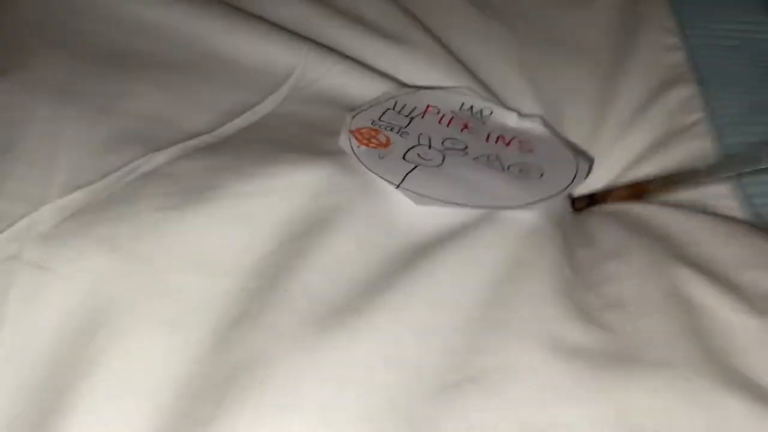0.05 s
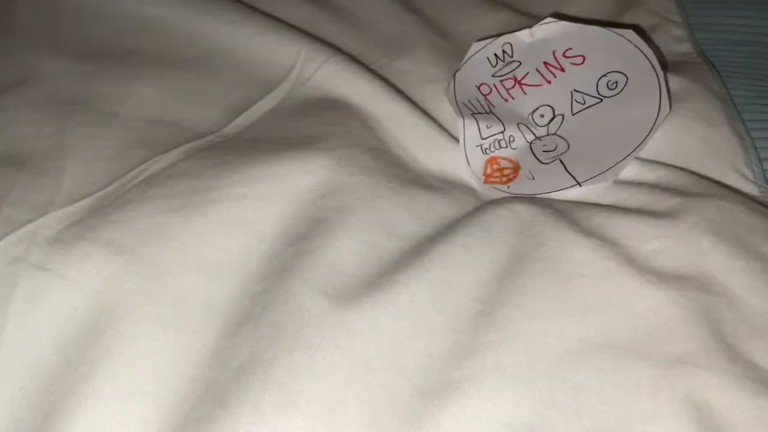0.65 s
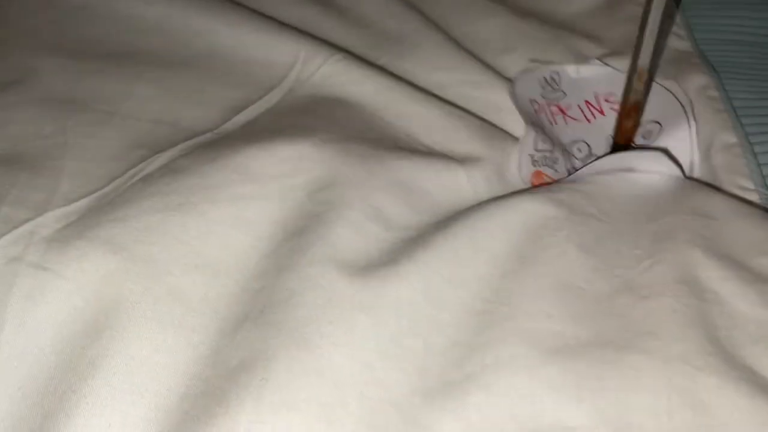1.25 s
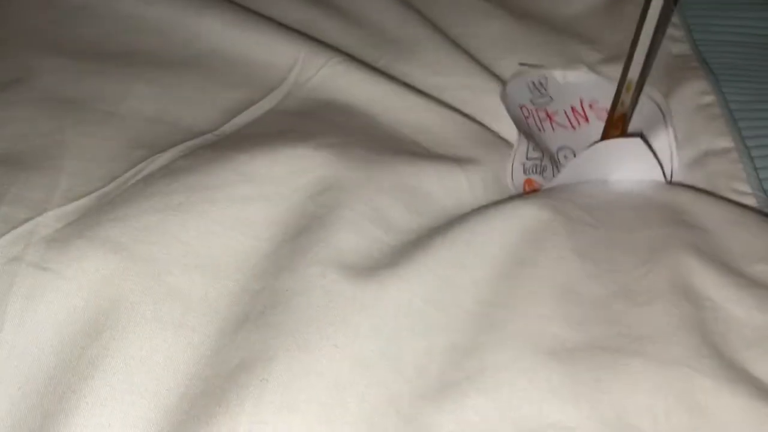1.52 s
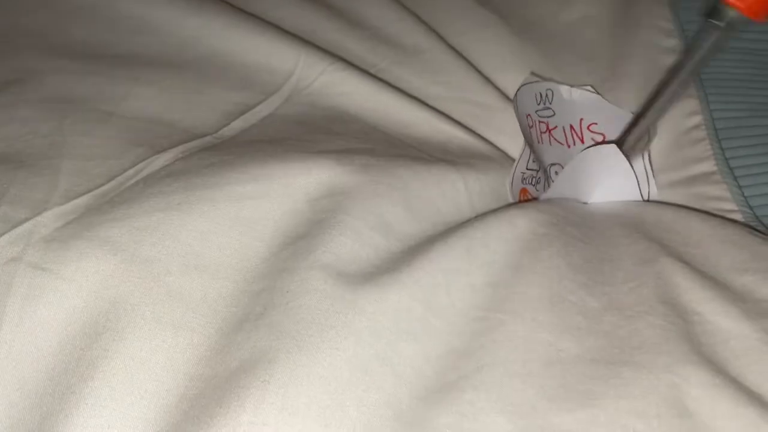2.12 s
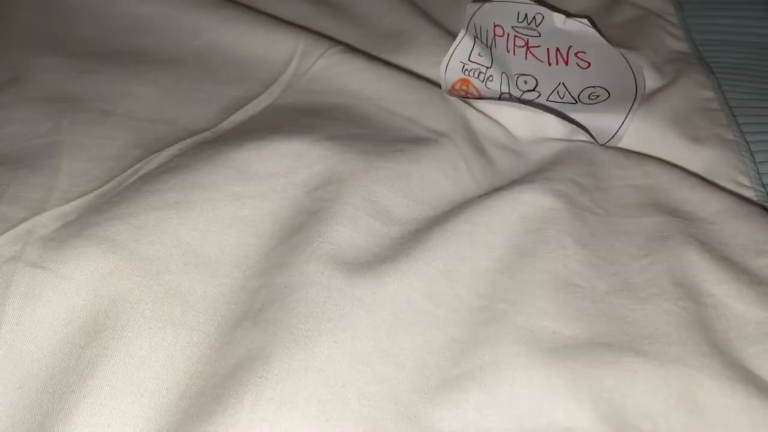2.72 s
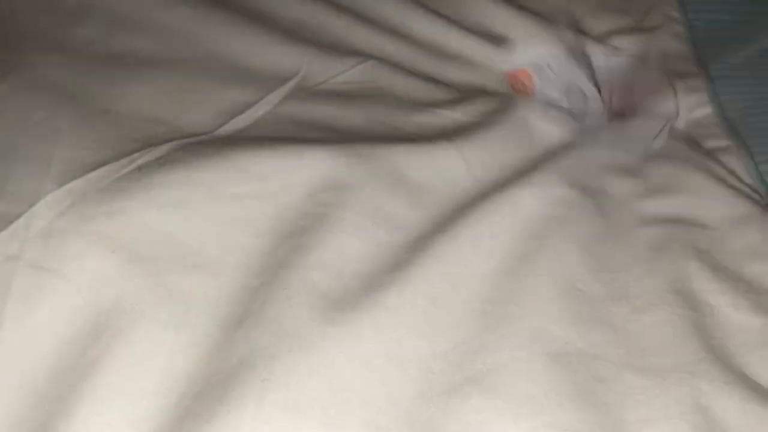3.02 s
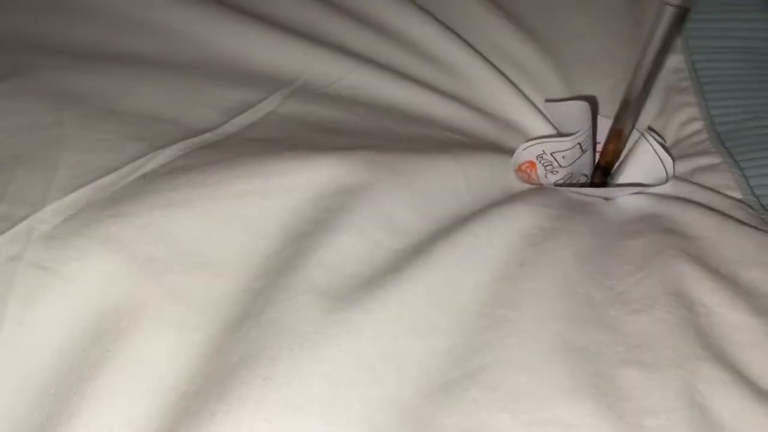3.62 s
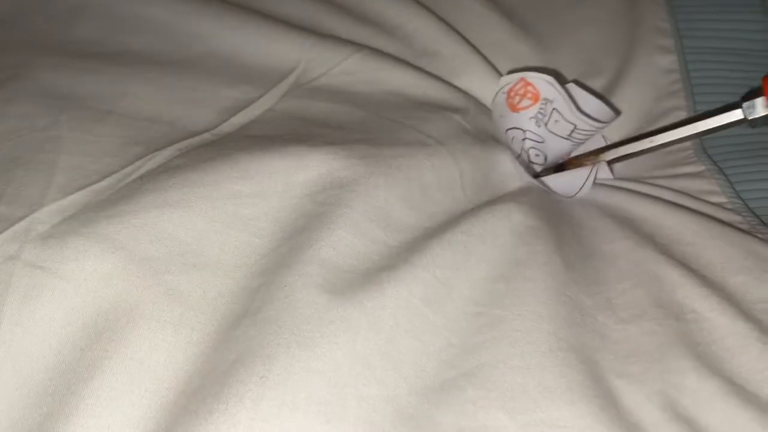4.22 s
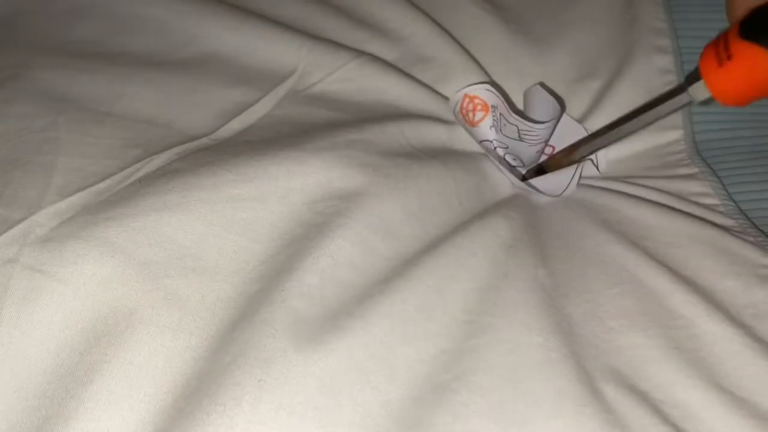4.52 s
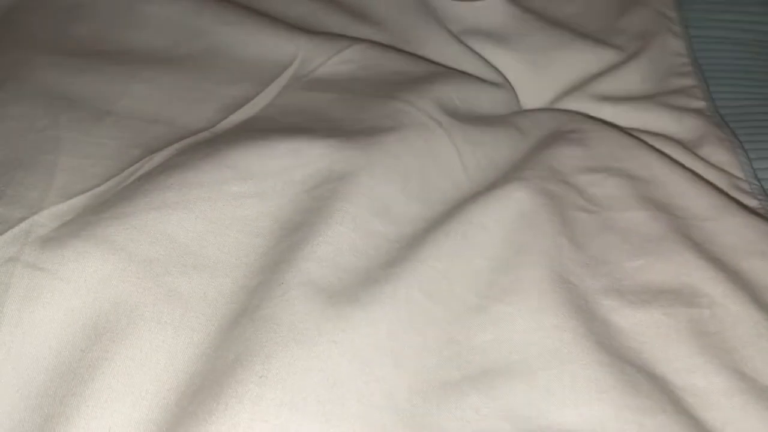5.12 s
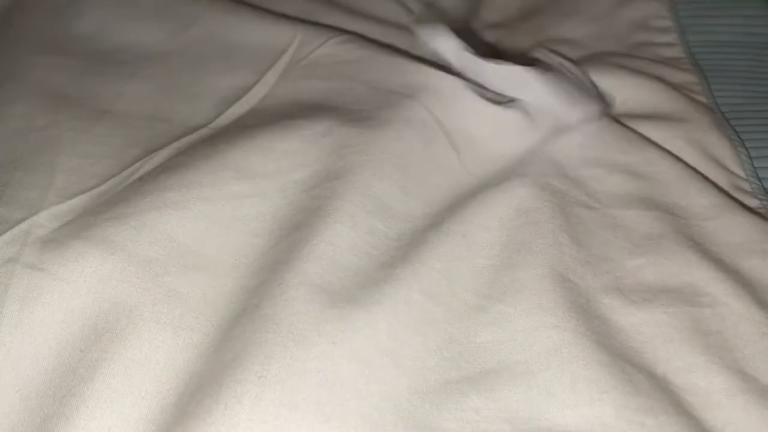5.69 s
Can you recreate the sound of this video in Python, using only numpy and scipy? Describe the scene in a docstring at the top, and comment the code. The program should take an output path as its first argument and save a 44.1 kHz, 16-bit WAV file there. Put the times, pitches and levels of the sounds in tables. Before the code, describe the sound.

A soft, low thump of bedding opens, close by in a quiet bedroom with a steady low murmur. At 0.4 seconds a screwdriver jabs a paper disc on the duvet: a sharp slap, a brief crackle, a hollow knock and a thump. A lighter jab follows at 0.8. From 1 to 2.5 seconds, paper and blade slide over the cotton in faint, short hisses and dull rustles, with a very faint, thin whistle at 1.2. The loudest jab lands at 2.9 seconds with a deep thud, then a lighter double tap at 3.4. Soft scrapes return from 3.8, with a brighter swish and a tiny zip of threads at 4.7 and small paper ticks just after. Another crunching jab and thump comes at 5.4 seconds, trailed by a hissing scrape and a small tap around 5.7.

```python
"""A screwdriver jabs a paper disc lying on a duvet, close by in a quiet bedroom.
Each jab slaps the paper, crumples it and thumps the bedding; the disc pops with a hollow knock.
Between jabs paper and blade hiss over the cotton, with dull rustles and thread zips.
A faint, thin whistling tone sounds once.
Two closely spaced microphone ports on a camera hear it all over the low murmur of the room."""
import sys
import numpy as np
from scipy import signal
from scipy.fft import rfft, irfft
from scipy.io import wavfile
from scipy.ndimage import uniform_filter1d

SR = 44100
rng = np.random.default_rng(int(sys.argv[2]) if len(sys.argv) > 2 else 0)


def transcribe(signal):
    """Save signal, clipped to [-1, 1], as a 16-bit WAV file at the path in sys.argv[1]."""
    frames = np.atleast_2d(signal).T
    limited = np.clip(frames, -1, 1)
    pcm = np.round(limited * 32767).astype(np.int16)
    wavfile.write(sys.argv[1], SR, pcm)


N = 262395
TIME, HZ = np.arange(N) / SR, np.fft.rfftfreq(N, 1 / SR)


def amp(db):
    """Decibels to gain."""
    return 10 ** (np.asarray(db) / 20)


def unit(x):
    """Scales to an rms of one."""
    return x / np.sqrt(np.mean(x ** 2) + 1e-20)


def curve(points, hz):
    """Reads a table along a log-frequency axis."""
    freqs, values = np.transpose(points)
    return np.interp(np.log(hz + 1), np.log(freqs + 1), values)


def add(mix, time, sound):
    """Mixes a sound in at a time in seconds; one that began before zero is already under way."""
    start = round(time * SR)
    sound = sound[max(-start, 0):]
    part = mix[max(start, 0):][:len(sound)]
    part += sound[:len(part)]


def ring(x, colour, size=2048):
    """A causal EQ; colour gives its dB at any frequency."""
    log_gain = np.log(amp(colour(abs(np.fft.fftfreq(size, 1 / SR)))))
    response = np.fft.ifft(np.exp(np.conj(signal.hilbert(log_gain)))).real
    return signal.oaconvolve(x, response[:size // 2])[:len(x)]


def wander(n, span, passes=1):
    """A random modulator: noise smoothed over span samples."""
    noise = rng.standard_normal(n)
    for _ in range(passes):
        noise = uniform_filter1d(noise, span)
    return unit(noise)


def stroke(time, hold, db, attack, release, drift_db=0):
    """One sound's envelope: swells until time, drifts by drift_db while it holds, dies away."""
    fade = np.maximum(time - TIME, 0) / attack + np.maximum(TIME - time - hold, 0) / release
    progress = np.clip((TIME - time) / hold, 0, 1)
    return amp(db + drift_db * progress) * np.exp(-np.minimum(fade, 20))


def friction(slips_per_s, spread_db, smooth_share, flutter_db):
    """Tiny slips of uneven size in a smooth hiss; the grip varies every few milliseconds."""
    sizes = amp(spread_db * np.minimum(rng.exponential(1, N), 4))
    slips = rng.standard_normal(N) * sizes * (rng.random(N) < slips_per_s / SR)
    grip = amp(flutter_db * wander(N, span=260, passes=2))
    hiss = rng.standard_normal(N)
    return (np.sqrt(1 - smooth_share) * unit(slips) + np.sqrt(smooth_share) * hiss) * grip


def pitch_drops(hits, glide_share, sharpness, roughness):
    """A struck sheet drags ever more of itself along, so its pitch falls as it swells and dies."""
    out, t = np.zeros(N), np.arange(SR // 5) / SR
    for time, db, first_hz, last_hz, attack in hits:
        glide = glide_share * attack  # a slower blow also sinks more slowly
        hz = last_hz + (first_hz - last_hz) * np.exp(-t / glide)
        swell = (t / attack * np.exp(.5 * (1 - (t / attack) ** 2))) ** sharpness
        wobble = roughness * wander(len(t), span=int(SR / last_hz / 2), passes=2)
        add(out, time, amp(db) * swell * np.sin(2 * np.pi * np.cumsum(hz) / SR + wobble))
    return out


# Soft low thumps: (time [s], level [dB], start pitch [Hz], end pitch [Hz], attack [s])
BED_THUMPS = [(-.012, -17.5, 119.5, 73.1, .016), (.377, -29.5, 465, 62.3, .035),
              (.826, -42, 219.4, 71.87, .024), (1.685, -37.5, 144, 105.4, 0.013),
              (2.647, -35, 148, 78.4, .019), (2.8845, -17, 452.7, 59.67, .027),
              (2.962, -38, 123.4, 71.5, 0.021), (3.05, -46, 91.7, 68.45, 0.027),
              (3.387, -46, 520, 207, 0.0081), (3.420, -40, 329, 113.4, 0.0082),
              (3.44, -49.5, 109, 64.6, 0.013), (4.075, -44.5, 193.7, 164, .0205),
              (4.352, -43.5, 131.4, 85.5, .017), (5.398, -31.5, 453, 159, 0.0158),
              (5.423, -28, 190, 63.5, 0.024)]


def bed_thumps(rumble_db=-17, rumble_hz=68, t60_s=.17):
    """The bedding gives way; the mattress takes up each thump and rumbles on briefly."""
    thumps = pitch_drops(BED_THUMPS, glide_share=.41, sharpness=1.44, roughness=.28)
    t = np.arange(22000) / SR
    tail = rng.standard_normal(len(t)) * np.exp(-np.log(1000) * t / t60_s)
    tail = ring(tail, lambda hz: np.maximum(-14 * np.log2((hz + 1) / rumble_hz) ** 2, -90), size=8192)
    power = abs(rfft(tail)) ** 2
    passband_gain = np.sqrt((power ** 2).sum() / power.sum())
    return thumps + amp(rumble_db) * signal.fftconvolve(thumps, tail)[:N] / passband_gain


# Room tone EQ: (frequency [Hz], gain [dB])
MURMUR_EQ = [(20, -26), (42, -14.5), (65, -3.5), (110, -4), (180, -2.5), (270, .5), (400, -7.5), (560, -14),
             (1000, -23.3), (1600, -29.3), (2500, -38.5), (4000, -48.5), (6000, -55), (8000, -58),
             (16000, -66.5)]
# Room tone width: (frequency [Hz], left-right correlation [1 = mono])
MURMUR_CORRELATION = [(60, 0.98), (150, 0.95), (300, 0.8), (600, 0.21), (1500, 0.87), (6000, 1)]


def murmur(level_db=-49.5):
    """Steady low room noise, nearly the same at both ports in the bass."""
    left, other = rfft(rng.standard_normal((2, N)))
    shared = curve(MURMUR_CORRELATION, HZ)
    right = shared * left + np.sqrt(1 - shared ** 2) * other
    spectra = np.array([left, right]) * amp(curve(MURMUR_EQ, HZ))
    return amp(level_db) * unit(irfft(spectra, N))


# Hollow pops: (time [s], level [dB], start pitch [Hz], end pitch [Hz], attack [s])
KNOCKS = [(.376, -26.5, 1395, 420, 0.0023), (.7985, -27.5, 436, 175.3, 0.0027),
          (.7975, -39, 1500, 800, 0.0017), (.8265, -38, 1238, 420, 0.0022),
          (2.8825, -24.5, 947, 340, .0026), (2.886, -35.5, 680, 482, 0.0039),
          (3.3885, -34, 1088, 288, 0.0012), (3.4218, -34.5, 1345, 860, 0.00225),
          (4.3435, -47.5, 1630, 690, 0.0022), (5.3995, -35.5, 960, 346, 0.0022),
          (5.652, -48.5, 880, 740, 0.0059)]


def knocks():
    """The disc pops through with a hollow, falling knock."""
    return pitch_drops(KNOCKS, glide_share=1.6, sharpness=2.8, roughness=.23)


# The paper's resonant peaks: (frequency [Hz], width [Hz], boost [dB])
DISC_MODES = [(1150, 67, 7), (1630, 110, 7), (2650, 460, 2.5), (3260, 440, 6), (4105, 300, 5),
              (5414, 420, 6), (6950, 510, 7.5), (7950, 450, 8.5)]


def disc_body(x, tuning, tilt_db):
    """The disc's resonances lift narrow bands and ring on briefly; each new bend retunes them."""
    def colour(hz):
        peaks = sum(db / (1 + (2 * (hz / tuning - f) / width) ** 2) for f, width, db in DISC_MODES)
        return peaks + tilt_db * np.log2(np.maximum(hz, 1000) / 5000)
    return ring(x, colour)


# Slap EQ of flat and of creased paper: (frequency [Hz], gain [dB])
FLAT_EQ = [(100, -6.5), (350, 0.5), (600, 1), (1150, -0.5), (1500, -7), (1900, -4), (2300, -4.5),
           (2700, -8), (3500, -8.5), (4200, -2.5), (5500, 7.5), (6300, -5), (6900, -1), (7900, 1.5),
           (9000, -9.5), (13000, -12), (15500, -13)]
CREASED_EQ = [(100, -10), (550, 1), (820, -4.5), (1150, -15), (1650, -9.5), (2100, -6), (3200, -5.5),
              (4000, -3.5), (4500, -8.5), (5450, -6.5), (6050, 3.5), (6500, -7), (7000, 1), (8500, -1.5),
              (9200, 6), (10100, -5), (10900, 8), (11700, -8.5), (12500, -6), (14000, -10), (15500, -6.5)]
# The tip slaps the paper, or the paper snaps:
# (time [s], relative level [dB], decay [s], crease [0 flat, 1 creased], tuning [ratio], tilt [dB/oct])
SLAPS = [(0.3765, -21, .002, 0.022, 1.08, -1), (0.382, -47, 0.0013, .1, 1.0, -1),
         (.7936, -36.5, 0.004, 0.58, 0.88, -2), (0.822, -47, 0.0035, .3, 0.54, -3),
         (0.8264, -48.5, 0.0014, 0.26, 0.87, -4.5), (2.8824, -16, 0.0014, 0.94, 1.025, 0.5),
         (2.888, -33, .0033, 0.28, 1.17, 2), (2.999, -45.5, 0.0022, 0.66, 1.12, 2.5),
         (3.018, -61, 0.0018, 0.55, 0.74, 2.5), (3.075, -79.5, 0.0036, 0.56, 1.0, 7.5),
         (3.3863, -41, .0034, 0.22, 0.99, -4), (3.4165, -44, .0024, 0.54, 0.79, -2),
         (3.430, -50.5, 0.0014, .4, 1, -2), (3.4509, -49.5, .0012, 0.95, 1.9, -3),
         (4.481, -55, 0.0026, 0.69, 1.2, -2.5), (4.778, -63, 0.0027, 0.3, 0.96, 1),
         (4.823, -48.5, 0.0053, 0.37, 0.83, 0.5), (4.830, -52.5, 0.0026, 1, 1.04, -2),
         (4.844, -60, 0.0057, 0.47, 0.895, 1), (4.858, -62.5, .0093, .64, 1.2, -6),
         (4.9097, -53.5, 0.0076, 0.54, 1.07, -1), (4.927, -57.5, 0.014, 0.52, 1.06, -4.5),
         (5.3873, -36.5, .0027, 0.77, 1.22, -1), (5.399, -35, 0.0035, .6, 1.17, -0.5),
         (5.4043, -39, .0014, 0.76, 1.17, -2), (5.417, -37.5, 0.0012, .4, 1.17, 0),
         (5.6507, -45.5, 0.0014, 0.85, 0.84, -2)]


def slaps(attack_s=.00092):
    """A burst of buckling a few milliseconds long rings the disc; creases make it brighter."""
    out, t = np.zeros(N), np.arange(4096) / SR
    for time, db, decay, crease, tuning, tilt in SLAPS:
        swell = np.minimum(t / attack_s, 1) ** 2 * np.exp(-np.maximum(t - attack_s, 0) / decay)
        burst = rng.standard_normal(len(t)) * swell
        burst = irfft(np.exp(1j * np.angle(rfft(burst))))  # the blow drives all frequencies alike
        limit = swell * burst.std() / swell.std() + 1e-9
        burst = np.tanh(burst / limit) * swell  # each buckle travels only so far
        slap = ring(burst, lambda hz: (1 - crease) * curve(FLAT_EQ, hz / tuning)
                    + crease * curve(CREASED_EQ, hz / tuning))
        slap *= np.sqrt(220) / np.linalg.norm(slap)  # the energy of 5 ms at unit rms
        add(out, time, amp(db) * disc_body(slap, tuning, tilt))
    return out


# Crackle EQ: (frequency [Hz], gain [dB])
CRUMPLE_EQ = [(100, -8), (500, -3.5), (1150, -12.5), (2000, -9.5), (2600, -12.5), (3300, -11),
              (4200, -10.5), (5600, -5.5), (7000, -7.5), (9000, -10), (12000, -10.5), (15500, -10.5)]
# The paper crunches as the tip drives in, then settles:
# (time [s], hold [s], relative level [dB], release [s], tuning [ratio], tilt [dB/oct])
CRUMPLES = [(.388, 0.0081, -36, .016, 1.0, 0), (0.805, 0.0085, -41.5, 0.006, 1.03, 0.5),
            (0.819, 0.013, -45.5, 0.026, 1.1, 0.5), (2.882, .0054, -37.5, 0.029, 1.0, -2.5),
            (3.388, 0.015, -46, 0.011, 0.98, 2), (3.401, 0.013, -44.5, 0.025, 0.99, -1),
            (5.388, 0.017, -39.5, 0.017, 1.03, .5)]


def crumples(gain_db=-2, attack_s=.001):
    """The disc folds round the tip in a dense crackle."""
    crackle = friction(slips_per_s=4500, spread_db=3, smooth_share=.62, flutter_db=1.45)
    crackle = unit(ring(crackle, lambda hz: curve(CRUMPLE_EQ, hz)))
    out = np.zeros(N)
    for time, hold, db, release, tuning, tilt in CRUMPLES:
        fold = crackle * stroke(time, hold, db, attack_s, release, drift_db=2)
        start = time - 2 * attack_s
        add(out, start, disc_body(fold[round(start * SR):][:16384], tuning, tilt))
    return amp(gain_db) * out


# Cotton hiss EQ: (frequency [Hz], gain [dB])
SLIDE_EQ = [(100, -18), (800, -12), (1200, -8), (2000, -3), (2700, 2), (3350, 3.5), (4400, -1.2), (5300, 0),
            (6300, -3.1), (7100, -.5), (9000, -9.5), (11000, -13), (12700, -14), (14200, -21),
            (15600, -21.5)]
# Paper and blade swish over cotton: (time [s], hold [s], relative level [dB], attack [s], release [s],
# drift over the hold [dB], tilt [dB/oct], edge resonance [Hz])
SLIDES = [(0.487, 0.037, -55, 0.019, .0043, -2, 7.5, 6900), (0.544, .075, -77, .018, .012, -3, 6, 5500),
          (.915, 0.022, -74, 0.013, .02, 1, 2, 5500), (0.965, 0.013, -58, 0.013, 0.0084, 3, 9.5, 7450),
          (1.197, .11, -61, 0.034, 0.019, -5.5, 6, 6200), (1.35, .073, -67, .025, 0.018, -2, 5, 7000),
          (1.534, 0.027, -61.5, 0.026, 0.017, 0.5, 7.5, 5600),
          (1.64, 0.03, -71.5, 0.037, 0.079, -3, 4.5, 5500),
          (2.179, 0.098, -56, 0.023, 0.015, 3, 11.5, 12650),
          (2.384, 0.065, -55.5, 0.041, 0.015, -3, 8, 7000),
          (2.988, 0.016, -50.5, 0.012, 0.0027, -1, 10, 5800),
          (3.023, 0.058, -79, .03, 0.012, -2, 9.5, 5500), (3.804, 0.1, -62.5, 0.043, 0.037, 4, 7, 5440),
          (4.005, .027, -66.5, .018, .013, -5, 7, 3400),
          (4.078, .074, -55.5, 0.035, 0.028, -5.5, 7.5, 3450),
          (4.267, 0.056, -64.5, .057, 0.13, -5.5, 6.5, 3440),
          (4.451, 0.062, -67, 0.036, 0.15, -3, 1.5, 7000), (4.664, .056, -48, 0.012, 0.0086, -4.5, 9, 6240),
          (5.509, 0.15, -54.5, .011, 0.012, -6.5, 11, 5670)]


def slides(gain_db=10.5, pivot_hz=6000, edge_db=1.5, edge_octaves=.6):
    """The cotton weave rubs the paper in a fine hiss; the paper's free edge lifts one band."""
    weave = friction(slips_per_s=7000, spread_db=1.5, smooth_share=.88, flutter_db=.55)
    hiss = unit(ring(weave, lambda hz: curve(SLIDE_EQ, hz)))
    powers = np.array([stroke(*slide[:-2]) for slide in SLIDES]) ** 2
    total = powers.sum(0)
    hz, t, spectra = signal.stft(hiss, SR, nperseg=256)
    # The tone crossfades between slides, led by the loudest.
    slope, edge_hz = (np.interp(t, TIME, column @ powers / total)
                      for column in np.transpose(SLIDES)[-2:])
    tilt = np.log2(np.maximum(hz, 2500) / pivot_hz)[:, None] * slope
    edge = edge_db * np.exp(-(np.log2((hz[:, None] + 1) / edge_hz) / edge_octaves) ** 2)
    swish = signal.istft(spectra * amp(tilt + edge), SR)[1][:N]
    return amp(gain_db) * swish * np.sqrt(total)


# Dull cloth EQ: (frequency [Hz], gain [dB])
RUSTLE_EQ = [(200, -16), (600, -4), (1050, 0), (1550, -4), (2000, -6), (2600, -8), (3300, -10), (4200, -17),
             (8000, -24), (16000, -39)]
# The tool leans on the duvet cover: (time [s], hold [s], level [dB], attack and release [s])
RUSTLES = [(.96, .028, -67, .03), (1.17, .13, -61, .07), (2.19, .26, -60, .03), (4.665, .055, -55.5, .015),
           (5.52, .11, -62.5, .02)]


def rustles():
    """Folds of cloth shift over the filling."""
    folds = friction(slips_per_s=1100, spread_db=3, smooth_share=.96, flutter_db=1.86)
    cloth = unit(ring(folds, lambda hz: curve(RUSTLE_EQ, hz)))
    return cloth * sum(stroke(time, hold, db, fade, fade) for time, hold, db, fade in RUSTLES)


# A brief, faint whistle: (time [s], hold [s], level [dB], pitch [Hz])
WHISTLE = [(1.17, 0.12, -64.5, 1562)]


def whistle(jitter=.035, fade_s=.025):
    """A faint, thin whistling tone near 1.5 kHz, its pitch wavering slightly."""
    out = np.zeros(N)
    waver = 1 + jitter * wander(N, span=130)
    for time, hold, db, hz in WHISTLE:
        tone = unit(np.sin(2 * np.pi * np.cumsum(hz * waver) / SR))
        out += tone * stroke(time, hold, db, fade_s, fade_s, drift_db=-4)
    return out


# An edge zips across threads: (time [s], length [s], level [dB], start pitch [Hz], end pitch [Hz])
ZIPS = [(4.658, .024, -54, 367, 1380), (4.704, .024, -61, 1300, 1050), (5.543, .03, -60, 2070, 1400),
        (5.562, .035, -62, 1400, 1000)]


def zips(overtone_db=-11, jitter=.04):
    """Each thread plucks the passing edge: the pitch is the rate at which they pass."""
    out = np.zeros(N)
    for time, length, db, first_hz, last_hz in ZIPS:
        n = round(length * SR)
        hz = np.linspace(first_hz, last_hz, n) * (1 + jitter * wander(n, span=60))
        phase = 2 * np.pi * np.cumsum(hz) / SR
        buzz = np.sin(phase) + amp(overtone_db) * np.sin(2 * phase)
        add(out, time, amp(db) * unit(buzz * np.hanning(n)))
    return out


# Stereo phase of the direct sound: (frequency [Hz], left lead [rad])
PORT_PHASE = [(100, 0.1), (480, 0.2), (850, -1.1), (1200, -0.6), (1600, -1.9), (2200, -3.0), (3200, -5.7),
              (4500, -7.0), (6400, -7.3), (9000, -9.3), (10800, -9.55), (13300, -12.2), (16000, -12.6)]
# Its panning: (frequency [Hz], left over right [dB])
PORT_BALANCE = [(130, -1), (280, -1.5), (550, 9.5), (1000, -2.5), (1600, -6.5), (2100, -6.5), (2700, -7.5),
                (3500, -.3), (5000, -1.8), (7000, -.5), (15000, -.3)]


def ports(x):
    """Direct sound reaches the right port first, and the camera body shades the left."""
    hz = np.fft.rfftfreq(2 * N, 1 / SR)
    left = np.exp(.5j * curve(PORT_PHASE, hz)) * amp(curve(PORT_BALANCE, hz) / 2)
    return irfft(rfft(x, 2 * N) * np.array([left, 1 / left]))[:, :N]


def early_reflections(x, size=500, count=8):
    """The first few bounces off surfaces round the bed, different at each port."""
    taps = np.zeros((2, size))
    delays = rng.integers(size // 8, size, (2, count))
    np.put_along_axis(taps, delays, rng.choice([-1., 1.], (2, count)), 1)
    return signal.oaconvolve(x[None], taps / np.sqrt(count), axes=1)[:, :N]


# Bedroom reverb: (frequency [Hz], time to fall 60 dB [s])
ROOM_T60 = [(100, 0.31), (1000, 1), (6000, 0.26), (15000, 0.015)]


def room(x, size=20000, predelay_s=.00057):
    """A soft-furnished tail of sparse reflections."""
    taps = rng.standard_normal((2, size)) * (rng.random((2, size)) < .1)
    taps *= np.arange(size) / SR > predelay_s
    hz, t, spectra = signal.stft(taps, SR, nperseg=256)
    decay = np.exp(-np.log(1000) * t / curve(ROOM_T60, hz)[:, None])
    tail = signal.istft(spectra * decay, SR)[1]
    return signal.fftconvolve(x[None], tail / np.linalg.norm(tail[0]), axes=1)[:, :N]


def scene(early_db=-17, paper_send_db=-25, bed_send_db=-24):
    """Paper and bedding up close, the room behind them."""
    foley = knocks() + slaps() + crumples() + slides() + rustles() + zips() + whistle()
    bedding = bed_thumps()
    early = amp(early_db) * early_reflections(foley)
    reverb = room(amp(paper_send_db) * foley + amp(bed_send_db) * bedding)
    return ports(foley + bedding) + early + reverb + murmur()


def record(dry, fade_s=.003, cutoff_hz=15850):
    """A quick fade-in and a steep high cut."""
    fade_in = np.minimum(TIME / fade_s, 1)
    lowpass = signal.firwin(301, cutoff_hz, window=("kaiser", 9), fs=SR)
    return signal.oaconvolve(dry * fade_in, lowpass[None], "same", axes=1)


dry = scene()
out = record(dry)
transcribe(out)
```